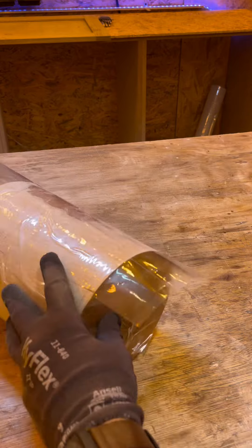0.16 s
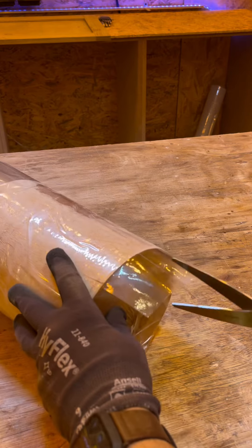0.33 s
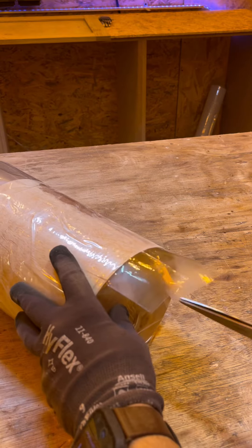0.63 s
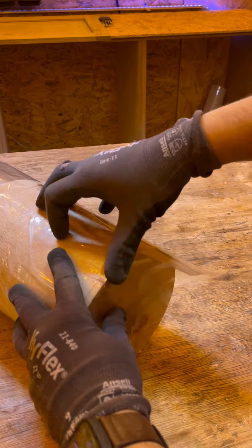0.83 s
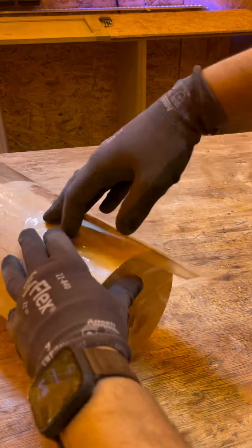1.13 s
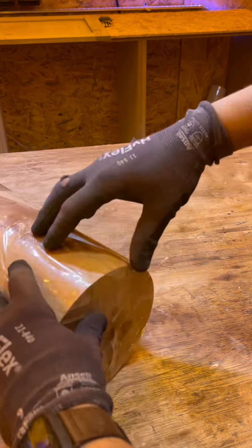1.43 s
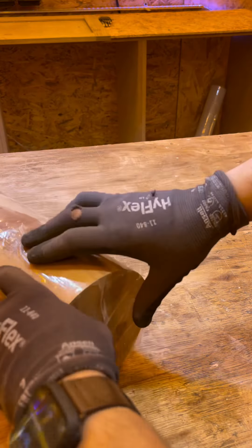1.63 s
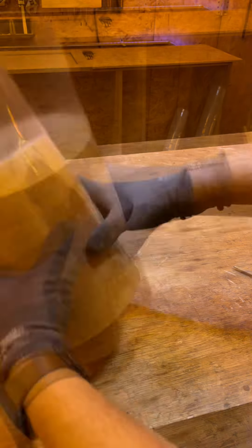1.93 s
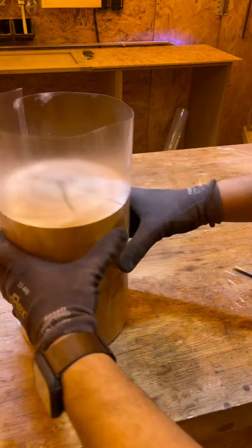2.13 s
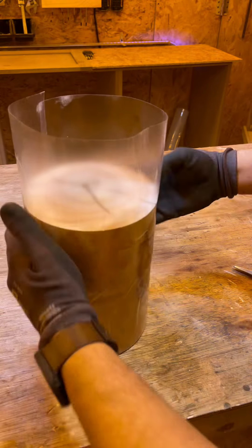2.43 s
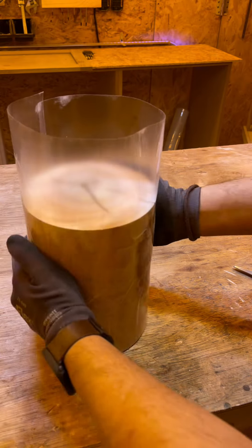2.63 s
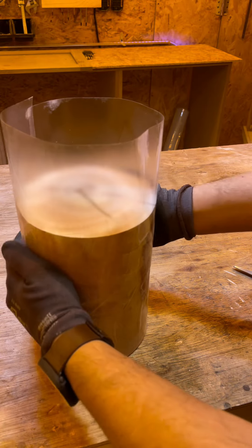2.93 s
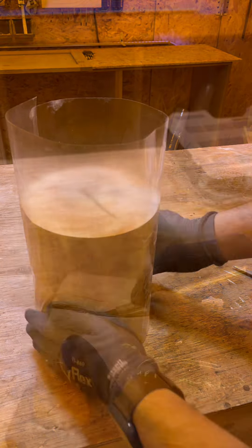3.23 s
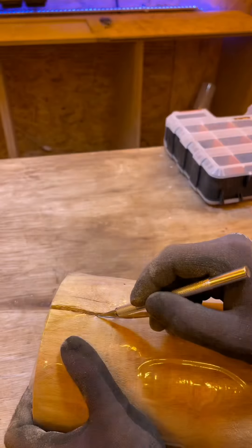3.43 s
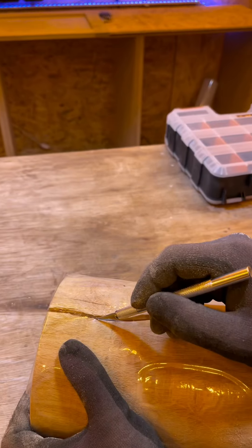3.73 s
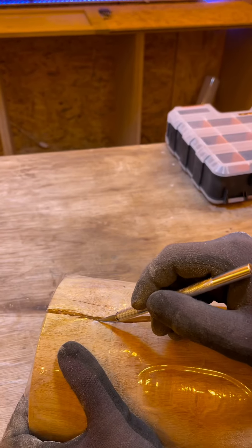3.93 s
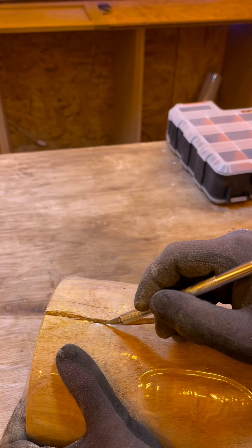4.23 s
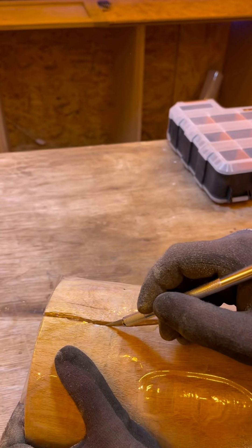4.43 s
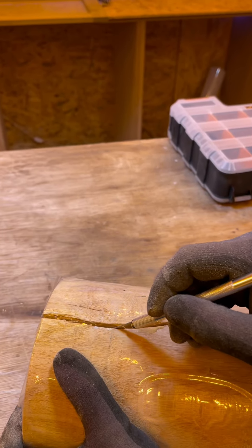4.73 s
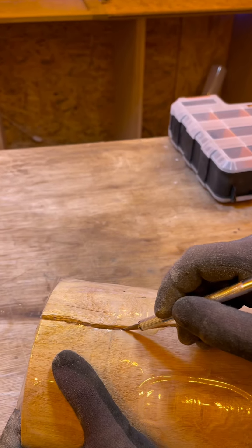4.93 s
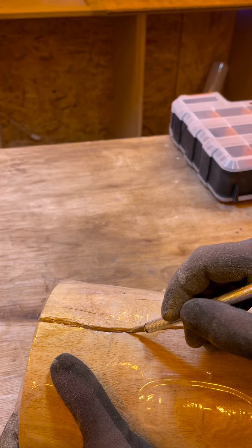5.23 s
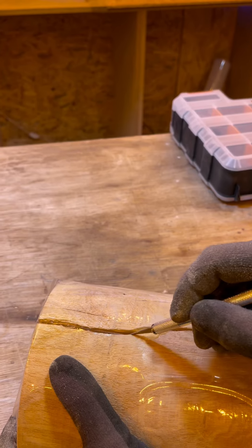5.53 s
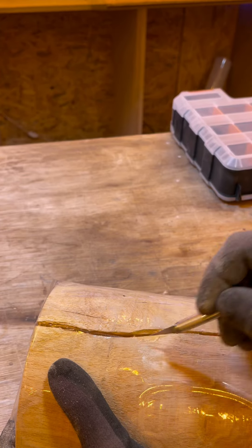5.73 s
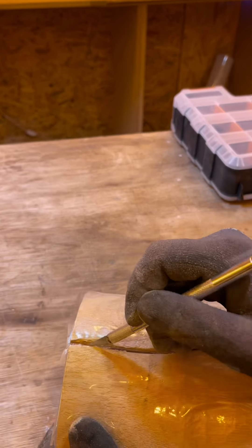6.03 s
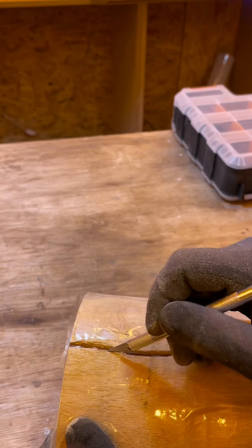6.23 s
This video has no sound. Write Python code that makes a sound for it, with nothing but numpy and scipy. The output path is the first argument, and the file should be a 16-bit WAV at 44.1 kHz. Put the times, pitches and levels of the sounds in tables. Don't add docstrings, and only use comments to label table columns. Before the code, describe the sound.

A heat blower runs throughout in a small plywood workshop, a broad soft hiss over a strong low boom around 140 Hz that wavers slowly. From 0 s it is somewhat distant, with faint gloved rustling and small plastic snaps at about 0.2 and 0.65 s. At 0.7 s scissors shear film briefly and meet with a crisp click, jolting the log. Another plastic tick comes at 1.5 s. Around 1.75 s the roar becomes closer and fuller; a light knock at 1.85 leads to the log's edge at 1.98 and heavy face landing at 2.05, with a burst of bright crackles. From 2.3 to 2.8 s the open sleeve hums softly mid-pitched. Snaps strike at 3.14, 3.33 and 3.44 s. Then mostly roar, surging near 4.3, with faint film rustle around 4.9 and a snap at 5.68. After 6 s the blower is distant again, with slight rustling.

```python
import sys
import numpy as np
from scipy import signal
from scipy.fft import rfft, irfft, next_fast_len
from scipy.io import wavfile
from scipy.ndimage import uniform_filter1d

SR = 44100
rng = np.random.default_rng(int(sys.argv[2]) if len(sys.argv) > 2 else 0)


def attenuation_scalar(level_db):
    decades = np.asarray(level_db, float) / 20
    return 10 ** decades


def to_wav(s):
    ch = np.atleast_2d(s).T
    pcm = np.round(np.clip(ch, -1, 1) * 32767)
    wavfile.write(sys.argv[1], SR, pcm.astype(np.int16))


N = 280917
T = np.arange(N) / SR

# (from time [s], rumble level [dB], hiss level [dB], share of near roar [0-1])
POSITIONS = [
    (0, -30, -50.5, 0),
    (1.755, -27, -45, 0.98),
    (2.3, -29, -46.5, 0.97),
    (3.105, -28.5, -44, 1),
    (3.455, -28, -46, 1),
    (5.775, -27, -43.5, 1),
    (6.073, -31, -50, 0.02),
]
# (frequency [Hz], density [dB per Hz])
FAR_AIR = [(20, -91), (60, -77.5), (100, -69.5), (200, -65), (600, -69), (1100, -74), (1750, -81.5),
           (2700, -78.5), (4500, -83.5), (6500, -89), (10000, -88.5), (11500, -100), (16000, -125)]
# (frequency [Hz], density [dB per Hz])
NEAR_AIR = [(20, -94.5), (45, -65.5), (90, -64), (200, -62.5), (600, -68), (1100, -70), (1600, -79),
            (2500, -75.5), (4600, -81), (6500, -86.5), (10000, -88), (11500, -99), (16000, -125)]
# (frequency [Hz], likeness [0-1])
FAR_ALIKE = [(150, 1), (280, 0.92), (400, 0.63), (550, 0.7), (900, 0.05), (2000, 0), (2600, 0.04),
             (3800, 0.03), (4800, 0), (8000, 0.29), (11000, 0.7)]
# (frequency [Hz], likeness [0-1])
NEAR_ALIKE = [(150, 1), (280, 0.99), (400, 0.76), (550, 0.55), (800, 0.24), (1200, 0.53), (2100, 0.2),
              (2600, 0.36), (3800, 0), (4700, 0.65), (7000, 0.46), (9300, 0.69), (11000, 1)]
# (frequency [Hz], width [Hz], lift [dB])
ROOM = [(138.9, 16.5, 26.5), (170, 11, 16.5), (250, 8.7, 5), (278, 10.5, 9.5), (357, 8.3, -1.5),
        (459.1, 24, 8.5), (554, 52, 1), (731, 55, 6.5), (915, 31, 1), (1045, 43, 2.5)]
# (time [s], level [dB])
SURGES = [(.36, 1), (1.18, 3), (1.564, -3.5), (2.558, 7), (3.03, 3.5), (3.23, 7), (3.374, 6), (3.57, 3.5),
          (4.29, 8), (4.8, 4.5), (5.23, 3.5), (5.52, 2.5), (5.9, 4.5), (6.0, -5), (6.24, -0.5)]
# (time [s], peak [dB], time to fall 10 dB [s], negative = swell reversed in time)
GRIPS = [(.166, -66, 0.5), (.602, -51.5, .01), (.636, -58, .02), (1.314, -62.5, 0.34), (1.676, -52.5, 0.07),
         (1.79, -58, 0.2), (1.978, -46, 0.0046), (2.051, -44, .006), (2.075, -40, -0.0158), (2.2, -57, .08),
         (2.5, -53.5, -0.18), (2.624, -62, 0.3), (2.73, -50, -0.02), (3.09, -60.5, 0.4), (3.16, -53, -0.03),
         (3.3, -54, -0.07), (3.345, -48, .02), (3.44, -61, 0.1), (4.83, -62, 0.8), (4.924, -61, 0.55),
         (5.81, -75, 0.11), (6.19, -56.5, 0.06), (6.345, -62, -1.1)]
# (frequency [Hz], density [dB per Hz])
FILM = [(500, -17), (2000, 2.5), (3000, -16), (5000, -3), (8000, -4), (10500, -1.5), (13000, -22.5),
        (16000, -36)]
# (time [s], peak [dB], body [dB], edge [dB])
SNAPS = [(0.1659, -27, -11.5, -33), (.1734, -36, -7, -39), (0.6502, -38.5, 1, -50), (1.4797, -25, -1, -24),
         (1.6864, -28.5, -1, -31), (1.9806, -34, -3.5, -16), (1.9936, -21, -7, -22), (2.049, -17, 0, -28),
         (2.0504, -10, -9.5, -26), (2.059, -31, -8, -14), (2.0674, -28, 2, -27), (2.0768, -24, -9, -20),
         (2.1061, -23.5, -1, -24), (2.1374, -31.5, -9.5, -50), (2.1524, -35.5, 7, -46),
         (2.192, -37.5, 9.5, -28), (2.4938, -25, -8, -42), (2.684, -28, -1, -50), (2.7318, -29, -1, -50),
         (3.105, -38, 8, -43), (3.1398, -15, -10, -28), (3.149, -20, -7, -45),
         (3.3314, -15.5, -12.5, -30.5), (3.4374, -27, -8, -10), (4.8304, -37.5, -1, -50),
         (4.9276, -43.5, -1.5, -50), (5.678, -22.5, -14, -16)]
# (frequency [Hz], width [Hz], level [dB])
CREASE = [
    [(6960, 4950, -1), (10900, 3400, 0.5)],
    [(2787, 2400, 3)],
    [(13800, 5500, 1)],
]
# (time [s], shear [dB], bench sound relative to shear [dB])
SNIP = [(.68, -71, 16), (.695, -41, 3), (.703, -40, -3.5), (.71, -50, 6), (.719, -32, -7), (.73, -25.5, -5),
        (.74, -43, 4), (.752, -53, 4), (.78, -78, 0.5)]
# (frequency [Hz], width [Hz], level [dB])
BLADES = [(527, 210, 6.5), (2560, 440, 5), (4770, 1900, -1), (7900, 2900, -3.5)]
# (time [s], peak [dB])
CLOSE = [
    (0.7222, -34),
    (0.7296, -14.5),
    (0.737, -25),
]
# (time [s], peak [dB], deep ring [dB], brightness [dB per octave])
THUDS = [
    (.7, -21, -21.5, 2),
    (.72, -12, -32, -2.5),
    (0.732, -24, -19.5, 0.5),
    (1.802, -35, -6.5, 7),
    (1.851, -22, 3.5, 2),
    (1.983, -12, 4, 0),
    (2.053, -7.5, 7, 2.5),
    (2.07, -13, -24, -3.5),
    (2.095, -26, 15, 2),
]
# (frequency [Hz], level [dB], t60 [s])
BENCH = [(138.4, -2, 0.53), (274, -2.5, 0.088), (366, -7.5, 0.15), (477, 5.5, 0.024), (553, 3, 0.029),
         (624, -5.5, 0.044), (818, -10.5, 0.053), (1034, -12, 0.031), (1246, -13, 0.035)]
# (frequency [Hz], t60 [s])
LEGS = (92, 0.34)
# (time [s], level [dB])
SLEEVE = [(2.258, -45.5), (2.33, -46), (2.43, -33), (2.53, -42), (2.64, -37), (2.75, -44)]
# (frequency [Hz], lead of the left port [rad])
LEAD = [(430, 0), (700, 3.3), (1250, 3.9), (1750, 6.4), (2400, 9.4), (2900, 9), (3700, 13), (4500, 15.7),
        (5500, 18.4), (8500, 21.8), (9700, 22.1), (11300, 25), (16000, 28)]
# (frequency [Hz], level [dB])
AUDIBLE = [(7500, -110), (8300, -83.5), (9300, -82.5), (10300, -87), (11200, -86), (13000, -90),
           (16000, -82)]

CHANGE_S, SURGE_S = 0.01, 0.036
GRIP_RISE, SING_RISE = 0.37, 0.84
SNAP_T60, SNAP_SPREAD_DB = 0.0045, 0.4
SING_S = 0.054
SCUFF_DB, SCUFF_T60, SCUFF_HZ = -21.5, 0.057, 2940


def blower():
    start, *cols = np.transpose(POSITIONS)
    place = np.searchsorted(start[1:], T)
    rumble_db, hiss_db, near = [uniform_filter1d(c[place], size=round(CHANGE_S * SR)) for c in cols]
    for s, db in SURGES:
        rumble_db = rumble_db + db * np.exp(-0.5 * ((T - s) / SURGE_S) ** 2)
    near = np.clip(near, 0, 1)
    far_roar = air(FAR_AIR, FAR_ALIKE, patchy_db=1.0)
    near_roar = air(NEAR_AIR, NEAR_ALIKE, patchy_db=1.13)
    out = 0
    for share, roar in ((1 - near, far_roar), (near, near_roar)):
        rumble = filtered(roar, lambda f: 1 / (1 + ((f * f - 142 ** 2) / (85 * f + 1)) ** 4))
        hiss = roar - rumble
        power = uniform_filter1d(np.mean(rumble ** 2, 0), size=SR // 6)
        steady = rumble / np.sqrt(abs(power) + 1e-20)
        upper = filtered(roar, lambda f: (f > 1500) & (f < 7000))
        out = out + share * (attenuation_scalar(rumble_db) * steady + attenuation_scalar(hiss_db + 3) * hiss / np.std(upper))
    return out


def air(spectrum, alike, patchy_db):
    z = signal.stft(rng.standard_normal((2, N)), nperseg=512)[2]
    field = rng.standard_normal(z.shape[1:])
    field = uniform_filter1d(uniform_filter1d(field, 6, 0), 10, 1)
    pair = signal.istft(z * attenuation_scalar(patchy_db * unit(field)), nperseg=512)[1][:, :N]

    def response(f):
        lift = np.sqrt(1 + sum(attenuation_scalar(2 * db) / (1 + (2 * (f - c) / w) ** 2) for c, w, db in ROOM))
        turn = np.arccos(np.clip(along(alike, f), 0, 1)) / 2
        return attenuation_scalar(along(spectrum, f)) * lift * [np.cos(turn), np.sin(turn)]

    mid, side = filtered(pair, response)
    return np.array([mid + side, mid - side])


def log():
    out, grit = np.zeros(N + SR), np.zeros(N + SR)
    t = np.arange(SR // 2) / SR
    for s, db, deep_db, bright_db in THUDS:
        ring = 0
        for hz, level, t60 in BENCH:
            ring_db = level + bright_db * np.log2(hz / 135) - 60 * t / t60
            ring = ring + attenuation_scalar(ring_db) * np.sin(2 * np.pi * hz * t)
        rock = attenuation_scalar(deep_db - 60 * t / LEGS[1]) * np.sin(2 * np.pi * LEGS[0] * t)
        out[round(s * SR):][:len(t)] += attenuation_scalar(db - 6.5) * (ring + rock) * (1 - np.exp(-t / 0.0029))
        scuff_db = db + 1.73 * bright_db + SCUFF_DB - 60 * t / SCUFF_T60
        grit[round(s * SR):][:len(t)] += attenuation_scalar(scuff_db) * (1 - np.exp(-t / 0.0027))
    edge = resonant([(SCUFF_HZ, 4000, 0)])
    crush = filtered(rng.standard_normal(N), lambda f: edge(f) / (1 + (f / 8000) ** 6))
    return out[:N] + grit[:N] * unit(crush)


def scissors():
    shear_db, bench_db = curves(SNIP, left=-120, right=-120)
    shear = attenuation_scalar(shear_db) * unit(filtered(grains(per_second=2400, spread_db=2.5), resonant(BLADES[1:])))
    bench = attenuation_scalar(shear_db + bench_db) * unit(filtered(rng.standard_normal(N), resonant(BLADES[:1])))
    blows = np.zeros(N)
    for s, db in CLOSE:
        blows[round(s * SR)] = attenuation_scalar(db + 19.5)
    meeting = filtered(blows, resonant(BLADES))
    return filtered(shear + bench + meeting, lambda f: 1 / (1 + (f / 10500) ** 10))


def snaps():
    out = np.zeros((3, 2, N + SR))
    t = np.arange(2000) / SR
    for s, db, body_db, edge_db in SNAPS:
        after = attenuation_scalar(-60 * t / SNAP_T60) * (1 - np.exp(-t / 0.00033)) * rng.choice([-1, 1], len(t))
        slip = attenuation_scalar(2) * (np.arange(len(t)) == 30)
        balance = attenuation_scalar(SNAP_SPREAD_DB * rng.standard_normal() * np.array([[1], [-1]]))
        crack = attenuation_scalar(db) * (slip + after) * balance
        i = round(s * SR)
        out[:, :, i:i + len(t)] += [crack, attenuation_scalar(body_db) * crack, attenuation_scalar(edge_db) * crack]
    parts = [filtered(x[:, :N], lambda f: resonant(modes)(f) ** 2) for x, modes in zip(out, CREASE)]
    return attenuation_scalar(8.5) * sum(parts)


def rustle():
    buckles = filtered(grains(per_second=6100, spread_db=7.0), lambda f: attenuation_scalar(along(FILM, f)))
    return attenuation_scalar(peaks(GRIPS, GRIP_RISE) + 7) * unit(buckles)


def grains(per_second, spread_db):
    hit = rng.random(N) < per_second / SR
    size = attenuation_scalar(spread_db * np.minimum(rng.exponential(size=N), 2))
    spikes = hit * size * rng.choice([-1, 1], N)
    return spikes * attenuation_scalar(2 * rng.standard_normal((2, N)))


def sleeve():
    db = peaks([(s, db, SING_S) for s, db in SLEEVE], SING_RISE)
    column = resonant([(759, 57, 0)])
    return attenuation_scalar(db - 3) * unit(filtered(rng.standard_normal(N), lambda f: column(f) ** 2))


def walls(x):
    hz, t, z = signal.stft(rng.standard_normal((2, SR // 3)), SR, nperseg=256)
    t60 = along([(300, 0.17), (3000, 0.1), (12000, 0.0242)], hz)[:, None]
    tail = signal.istft(z * attenuation_scalar(-60 * t / t60), SR, nperseg=256)[1]
    late = np.pad(x, (150, 0))[None]
    return signal.fftconvolve(late, tail / np.linalg.norm(tail[0]), axes=1)[:, :N]


def thinned(x):
    pair = np.pad([x[0] + x[1], x[0] - x[1]], ((0, 0), (445, 0))) / 2
    long = kept(pair, 2048, lift_db=0, masking=0.5)
    clicks = kept(pair - long, 256, lift_db=5, masking=0)
    mid, side = (long + clicks)[:, 445:]
    return np.array([mid + side, mid - side])


def kept(pair, size, lift_db, masking):
    hz, _, z = signal.stft(pair, SR, window="cosine", nperseg=size)
    power = np.abs(z) ** 2 * size / 2048
    band = uniform_filter1d(power, size=size // 80, axis=1)
    loud = np.mean(power[:, (hz > 1000) & (hz < 7000)], axis=(0, 1))
    floor = attenuation_scalar(2 * (along(AUDIBLE, hz) + lift_db))[:, None]
    keep = band > floor * (loud / np.median(loud)) ** masking
    return signal.istft(z * keep, SR, window="cosine", nperseg=size)[1][:, :pair.shape[1]]


def unit(x):
    return x / np.sqrt(np.mean(x ** 2) + 1e-20)


def along(points, hz):
    f, v = np.transpose(points)
    return np.interp(np.log(hz + 1), np.log(f + 1), v)


def curves(rows, **ends):
    s, *cols = np.transpose(rows)
    return [np.interp(T, s, c, **ends) for c in cols]


def peaks(rows, rise):
    swells = [db - 10 * np.maximum((T - s) / fall, (s - T) / (rise * fall)) for s, db, fall in rows]
    return np.max(swells, axis=0)


def filtered(x, response):
    m = next_fast_len(N + SR // 4)
    return irfft(rfft(x, m) * response(np.fft.rfftfreq(m, 1 / SR)), m)[..., :N]


def resonant(modes):
    def response(f):
        total = 0
        for k, (c, w, db) in enumerate(modes):
            total = total + (-1) ** k * attenuation_scalar(db) * 1j * f * w / (c * c - f * f + 1j * f * w)
        return total
    return response


def scene():
    film, cut, bench = rustle() + snaps(), scissors(), log()

    def ports(f):
        return np.exp(0.5j * np.outer([1, -1], along(LEAD, f)))

    def aside(f):
        return np.exp(1j * np.pi * np.outer([1, -1], f) * 8e-5)

    close = (film + cut).mean(0) + bench
    high = filtered(close, lambda f: 1 / (1 + (300 / (f + 1)) ** 4))
    direct = filtered(blower() + film, ports) + filtered(cut, aside) + bench + sleeve()
    return direct + attenuation_scalar(-9.5) * walls(high)


def top_cut(x):
    return signal.sosfilt(signal.butter(12, 15720, fs=SR, output="sos"), x)


def record(dry):
    heard = thinned(dry * attenuation_scalar([[0.2], [-0.2]]))
    return top_cut(heard)


dry = scene()
out = record(dry)
to_wav(out)
```